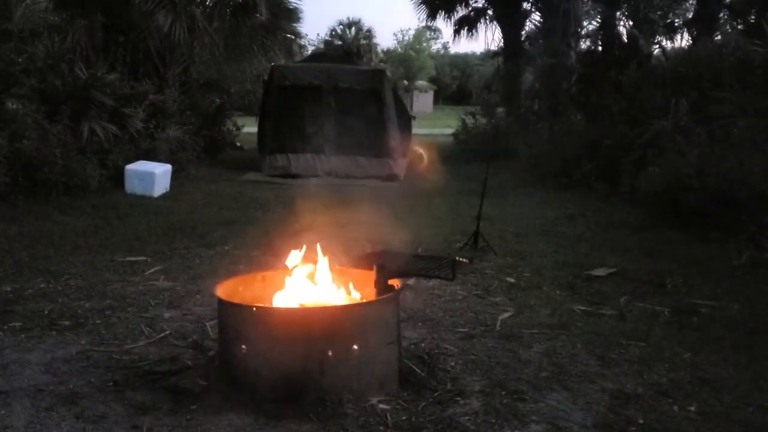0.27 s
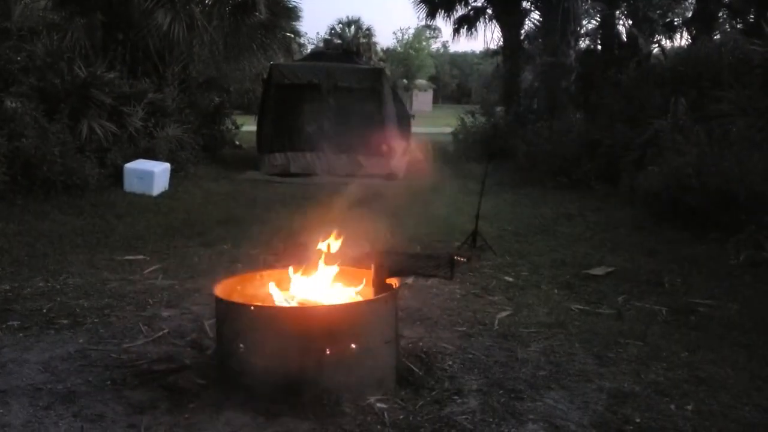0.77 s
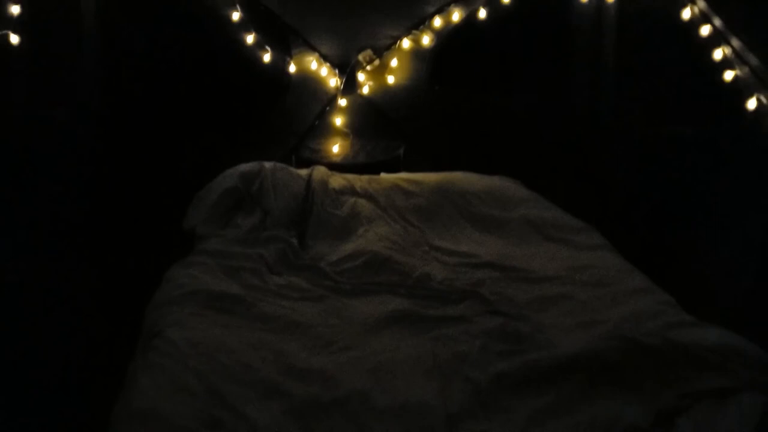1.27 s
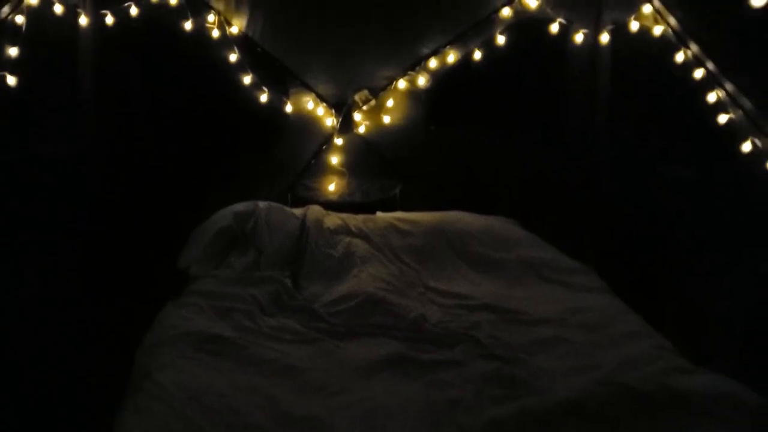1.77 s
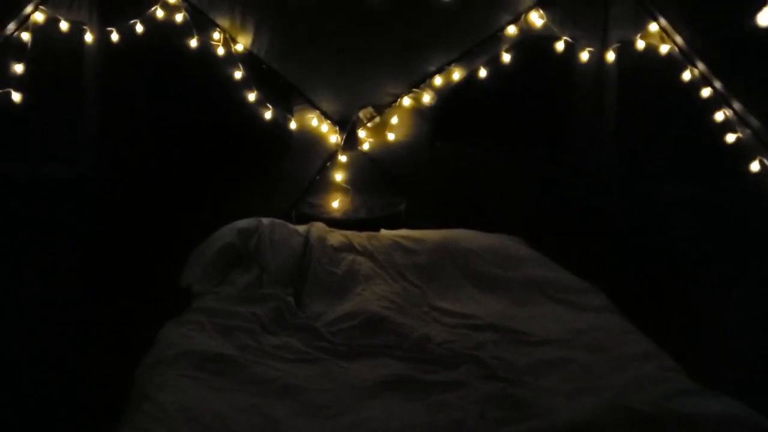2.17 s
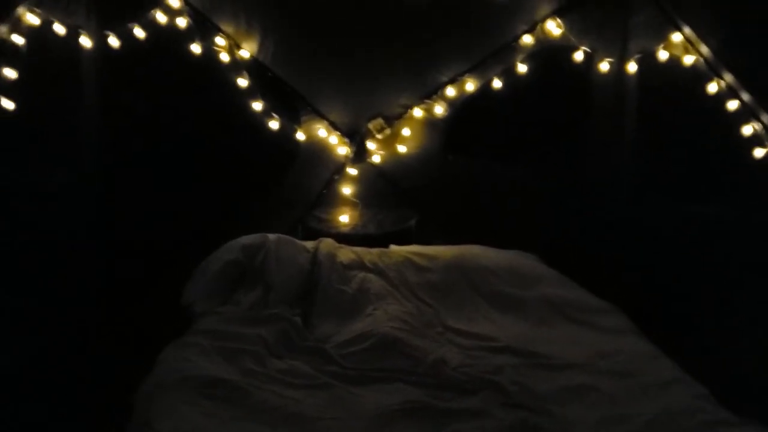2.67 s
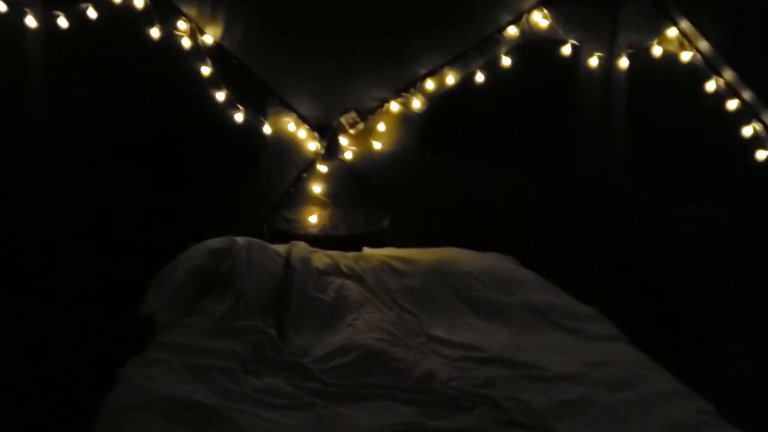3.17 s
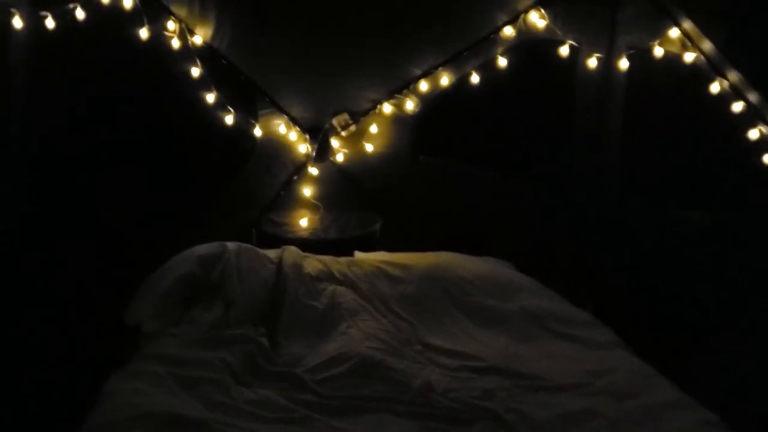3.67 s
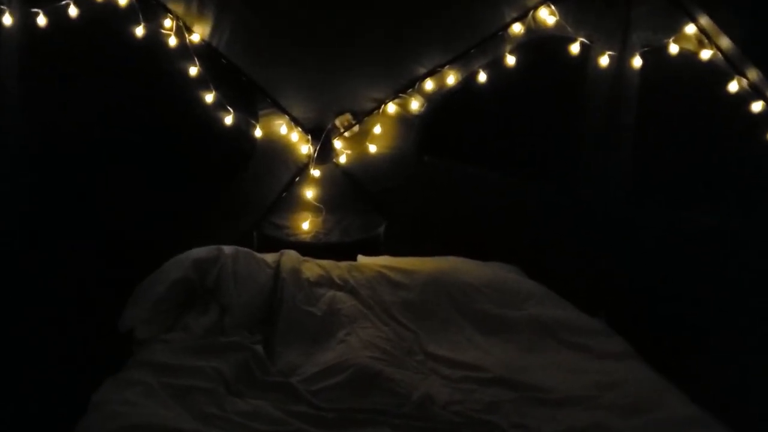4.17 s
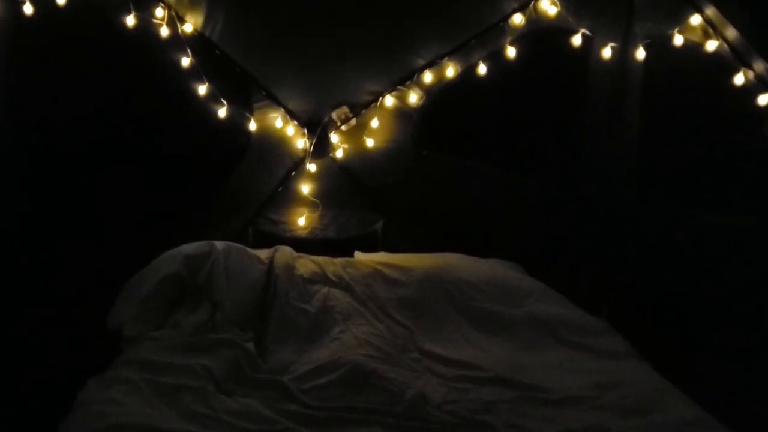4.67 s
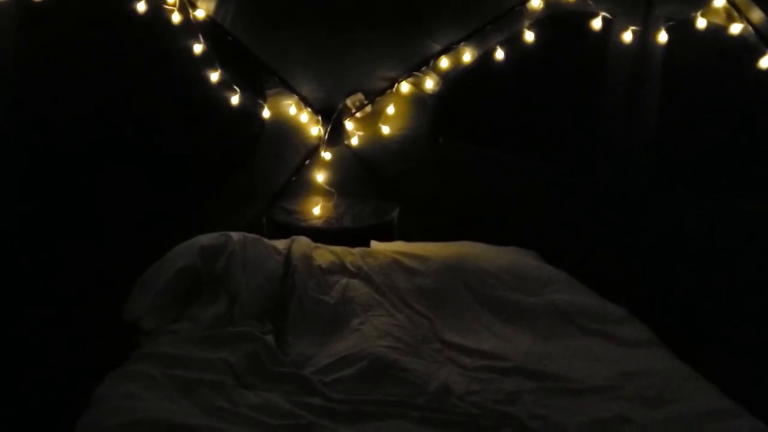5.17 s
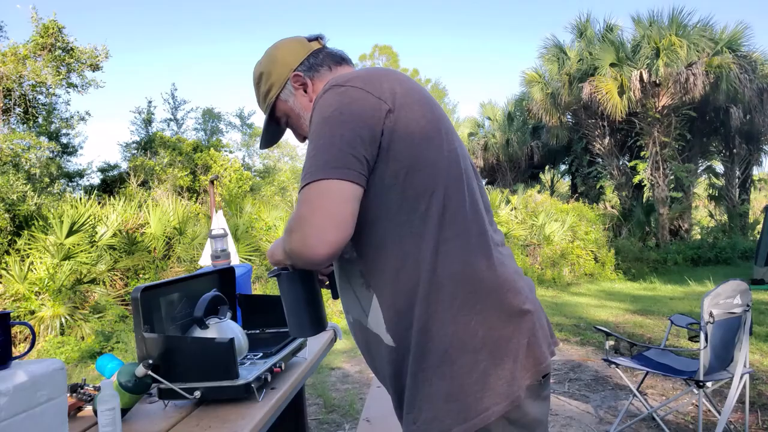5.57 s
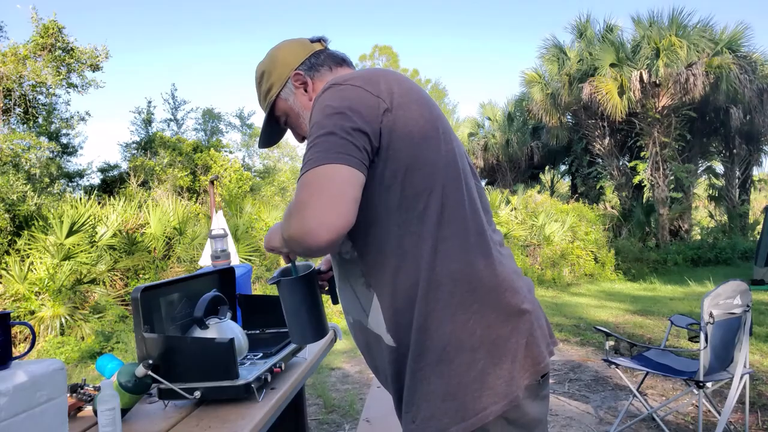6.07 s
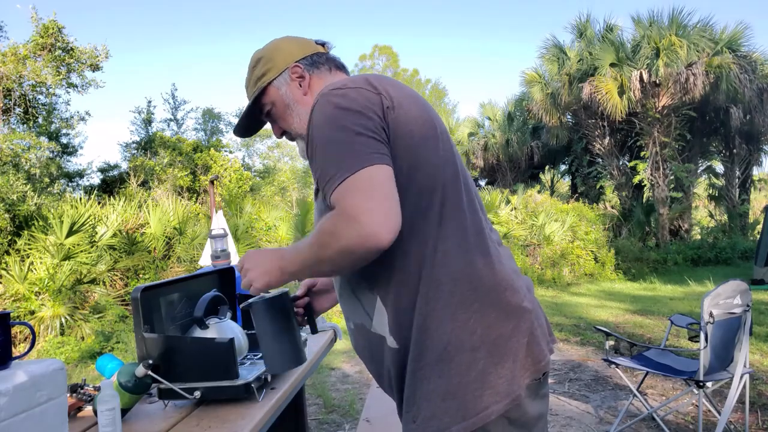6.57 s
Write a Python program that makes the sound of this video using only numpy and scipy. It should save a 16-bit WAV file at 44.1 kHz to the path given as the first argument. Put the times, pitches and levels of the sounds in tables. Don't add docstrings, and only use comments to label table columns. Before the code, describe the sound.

High crickets pulse over quiet night air, cut off by a dry plastic click; then in daylight a light metal tap and three ringing lid knocks.

```python
import sys
import numpy as np
from scipy import signal
from scipy.fft import rfft, irfft, next_fast_len
from scipy.io import wavfile
from scipy.ndimage import uniform_filter1d, map_coordinates

SR = 44100
rng = np.random.default_rng(int(sys.argv[2]) if len(sys.argv) > 2 else 0)


def transcribe(signal):
    frames = np.atleast_2d(signal).T
    limited = np.clip(frames, -1, 1)
    pcm = np.round(limited * 32767).astype(np.int16)
    wavfile.write(sys.argv[1], SR, pcm)


def rack_gain(trim_db):
    fader = np.asarray(trim_db, float)
    return 10 ** (fader / 20)


N = 300762
T = np.arange(N) / SR

# [fade-in start/s, full/s, fade-out start/s, gone/s]
PLACES = [
    (-.1, 0, .865, .895),
    (0.896, 0.923, 5.404, 5.413),
    (5.571, 5.595, 7, 7.1),
]

# [f/Hz, level per Hz/dB]
AIR_COLOUR = [
    [(13, -48), (22, -10.5), (81, 1), (180, -7), (389, -25.5), (1390, -34), (1730, -34), (3650, -35),
     (4550, -34.5), (5990, -18), (7270, -41.5), (7900, -52), (8580, -43.5), (12000, -37.5), (16200, -35)],
    [(13, -38), (22, -44), (55, 0), (85, 4.5), (173, -11.5), (384, -18.5), (764, -25.5), (1270, -36),
     (2420, -42), (4400, -31), (5720, -30.5), (9680, -120)],
    [(13, -50), (22, -25), (88, 1), (129, -11), (389, -20.5), (459, -16.5), (1050, -26.5), (1140, -19),
     (2200, -23.5), (2650, -23), (3300, -17.5), (3800, -23.5), (5300, -30), (5990, -31.5), (6690, -33.5),
     (7900, -44), (14900, -39.5), (16200, -22)],
]
AIR_DB = [-58.5, -59, -46.5]
# [f/Hz, likeness]
AIR_ALIKE = [
    [(60, 0.88), (240, 0.82), (950, 0.1), (3770, 0.042), (15000, 0.01)],
    [(60, 1), (240, 0.63), (950, 0.13), (3770, 0.033), (15000, 0.27)],
    [(60, 0.99), (240, 0.63), (950, 0.26), (3770, -0.45), (15000, 0.15)],
]
# [f/Hz, left minus right/dB]
AIR_LEAN = [
    [(60, -1.5), (180, -1.5), (550, -2.5), (1650, -5), (4970, 0.5), (15000, 8)],
    [(60, 19), (130, 34), (290, 7), (640, -1), (1410, 4.5), (3100, 3.5), (6820, -26), (15000, -2)],
    [(60, -1.5), (240, 0), (950, 0), (3770, 0.5), (15000, 8)],
]
# [t/s, level/dB]
ENGINE = [(0, -81), (.4, -91), (.85, -70), (.94, -62), (2.18, -73), (3.11, -72), (3.17, -88), (5.39, -69)]

# [f/Hz, level/dB, wing strokes per s]
HIGH_SINGERS = [(5630, -11, 60), (5720, -2, 57), (5800, -3, 50), (5880, 1, 63), (5945, 0, 55),
                (6050, -11, 66), (6160, -15, 59), (6260, -13, 52)]
# [f/Hz, level/dB, wing strokes per s]
LOW_SINGERS = [(5100, -3, 58), (5170, 0, 52), (5240, -2, 63), (5435, -1, 55)]
# [wing f/Hz, level/dB]
OVERTONE = [(5200, -24), (5740, -29), (5950, -39)]
# [t/s, left minus right/dB]
CHORUS_LEAN = [(0, 9), (.72, 0), (.88, -13.5), (2.82, -12.5), (3.97, -7.5), (5.39, -12)]
# [t/s, length/s, level/dB]
DUSK_HIGH = [
    (.14, 0.18, -61.5),
    (.66, 0.038, -61.5),
]
DUSK_LOW = [
    (.14, 0.15, -77),
    (.72, 0.19, -75),
]
NIGHT_HIGH = [(.92, 0.058, -47.5), (1.19, 0.18, -45), (1.59, 0.15, -46.5), (1.81, 0.12, -47),
              (2.03, 0.21, -48.5), (2.3, 0.16, -44.5), (2.53, 0.032, -47.5), (2.79, 0.11, -45),
              (3.0, 0.032, -53), (3.2, 0.21, -49), (3.56, 0.22, -53.5), (3.84, 0.041, -55.5),
              (4.18, 0.23, -53.5), (4.62, 0.15, -53.5), (4.84, 0.086, -61), (5.05, 0.18, -53.5)]
NIGHT_LOW = [(0.935, 0.077, -58), (1.167, 0.35, -59), (1.77, 0.17, -58), (2.125, 0.3, -57.5),
             (2.7, 0.33, -58), (3.22, 0.16, -61), (3.52, 0.25, -65), (4.07, 0.15, -60), (4.527, 0.2, -61),
             (5.07, 0.18, -56)]
PHRASE_RISE_S, PHRASE_FALL_S = 0.068, 0.12
DUSK_SHIFT, NIGHT_SHIFT = 1.01, 1.0

# [t/s, length/s, level/dB, climb/Hz]
DUSK_CALLS = [
    (.0648, 0.19, -62, 170),
    (.6928, .18, -60, 170),
]
# [t/s, length/s, level/dB, climb/Hz]
NIGHT_CALLS = [(.898, 0.14, -54.5, 9), (1.4767, 0.2, -56, 110), (2.1185, 0.18, -56, 110),
               (2.74, 0.18, -59.5, 129), (3.34, 0.19, -60.5, 157), (3.96, 0.2, -60, 154),
               (4.633, 0.086, -57.5, 177), (5.08, 0.2, -60, 125)]
# [t/s, length/s, level/dB, climb/Hz]
NEIGHBOUR_CALLS = [(.93, 0.12, -60, 116), (2.72, .08, -72, 61), (3.315, 0.027, -55.5, 59.3),
                   (3.78, 0.023, -72, 60.6), (4.51, 0.04, -75, 60), (4.61, 0.033, -63, 61),
                   (5.055, 0.098, -61, 91.3)]
# [t/s, second/dB, third/dB]
FACING = [
    (2.95, 0, -13),
    (3.3, -5, -1),
]
CALL_RISE_S, CALL_FALL_S, GLIDE_S = .065, .045, .042
OFF_PITCH_DB = .22
HALO_DB, HALO_S = -21.5, 0.18

# [t/s, level/dB]
THROBS = [(.085, -60), (0.167, -45.5), (.222, -45), (.28, -55), (.541, -62), (.583, -46), (.638, -50),
          (.699, -59), (.828, -59)]
THROB_S = 0.051
TRILL_DB, TRILL_LEAN_DB = -69.5, -5.5
PAUSE_S, PAUSE_LENGTH_S, PAUSE_DB = 2.276, 0.13, -23

# [t/s, level/dB]
RUB_EFFORT = [(.92, -90), (1.3, -79), (1.5, -85.5), (1.87, -74), (2.06, -71), (2.41, -77), (2.46, -69.5),
              (2.62, -71.5), (2.77, -65), (3.1, -71.5), (3.29, -65.5), (3.56, -74.5), (3.83, -69.5),
              (3.96, -76), (4.33, -66.5), (4.55, -80.5), (4.85, -65), (5.39, -72.5)]
# [t/s, level/dB]
SLIDE_SPEED = [(.92, -82), (1.2, -84), (1.35, -76), (1.6, -78.5), (1.9, -72), (2.1, -74), (2.55, -77),
               (2.85, -71), (3.1, -71.5), (3.4, -68.5), (3.6, -77.5), (3.85, -80), (4.05, -80),
               (4.3, -70.5), (4.5, -80), (4.75, -75), (4.95, -76.5), (5.39, -75)]
# [t/s, length/s, level/dB]
SWISHES = [
    (3.024, 0.0054, -60.5),
    (3.19, 0.053, -69),
    (3.268, 0.015, -58.5),
]
# [f/Hz, level per Hz/dB]
RUB_COLOUR = [(700, -19), (1300, -11), (2500, -5.5), (4000, -2.5), (6500, 2.5), (8000, -47)]
FIZZ_COLOUR = [(8200, -22), (9400, -11), (10300, -5.5), (11700, 0.5), (13300, -4), (14300, -5), (15300, -1),
               (16000, -4)]

# [t/s, f/Hz, level/dB]
NOTES = [(.955, 6350, -63), (.95, 5250, -53), (.98, 5350, -56), (1.08, 5680, -53.5), (1.21, 5170, -53),
         (1.279, 5900, -37.5), (1.595, 5900, -52), (2.075, 5950, -53), (2.8, 5420, -52), (2.85, 5970, -44),
         (2.898, 5680, -43), (2.95, 5160, -50), (3.02, 6160, -52), (3.08, 6250, -56), (3.165, 5780, -58),
         (3.33, 5400, -54), (3.399, 5880, -42.5), (3.919, 5800, -46), (3.98, 5870, -50), (4.11, 5460, -51),
         (4.23, 5920, -49), (4.35, 5980, -46.5), (4.47, 5470, -51), (4.5, 5800, -46), (4.6, 5640, -48),
         (4.69, 6170, -48), (4.7, 5420, -50), (4.74, 6230, -52), (4.87, 5400, -53), (5.049, 5990, -48),
         (5.171, 5950, -46), (5.241, 5670, -46)]
NOTE_S, NOTE_LEAN_DB = 0.031, -27
# [t/s, peak level/dB]
ENTRIES = [(1.5887, -38), (2.0678, -40), (2.815, -34.5), (3.159, -54), (3.301, -38.5), (3.907, -49),
           (4.567, -48), (4.6895, -42.5), (5.0427, -44)]
DYING_S = 0.34

# [t/s, peak level/dB]
FINGER_TICKS = [
    (5.0318, -57),
    (5.3513, -65),
]
# [t/s, peak level/dB, left minus right/dB]
BUTTON_TICKS = [
    (5.3995, -26, 3),
    (5.4037, -23, 3),
]

# [t/s, peak level/dB]
TAP = [
    (5.595, -26),
]
# [f/Hz, level/dB, time to fall 60 dB/s]
TAP_MODES = [(1383, -17, .4), (2007, -12, .1), (2438, -13, .15), (2768, 0, .48), (3242, -14, .2),
             (4217, -10, .2), (4270, -12, .2)]
# [t/s, level/dB, tilt per octave/dB, length/s]
SLEEVE = [
    (5.622, -47, 1.5, 0.029),
]
# [t/s, peak level/dB, rattle tilt per octave/dB, scrape/s, left minus right/dB]
KNOCKS = [
    (6.052, -11.5, 2, 0.0027, 4.5),
    (6.206, -11, 3.5, 0.043, 4),
    (6.371, -13, 2, 0.034, 4.5),
]
SETTLE_S = [0, 0, .013]
# [f/Hz, time to
# fall 60 dB/s, level at first knock/dB, at second/dB, at third/dB]
WALL = [(1195, 0.3, -33, -39, -41), (1382, 0.7, -34, -35, -33), (1432, 0.45, -34, -42, -27),
        (1867, 0.5, -26, -36, -26), (1877, 0.6, -31, -36, -30), (2400, 0.22, -31, -33, -27),
        (2439, 0.3, -37, -41, -35), (2627, 1.1, -20, -30, -21), (2762, 0.45, -40, -40, -39),
        (2836, 0.45, -35, -39, -38), (3021, 0.3, -33, -25, -38), (3120, 0.6, -48, -46, -39),
        (3255, 0.3, -29, -28, -23), (3563, 1.4, -44, -38, -35)]
STEEL_MODES = [(3147, 0.3, -39, -33, -37), (4087, 0.4, -46, -31, -38), (4138, 0.45, -36, -26, -34),
               (4198, 0.4, -34, -32, -30), (4214, 0.45, -33, -26, -30), (4270, 0.45, -35, -33, -36),
               (4600, 0.5, -38, -31, -39), (4652, 0.5, -34, -33, -45), (4880, 0.22, -41, -31, -40),
               (5200, 0.2, -37, -35, -46), (5408, 0.35, -38, -39, -37), (5580, 0.3, -44, -31, -43),
               (5853, 0.33, -29, -28, -38), (5953, 0.36, -42, -32, -40),
               (2660, .3, -44, -38, -43), (2740, .35, -41, -36, -39), (3088, .35, -44, -35, -43),
          (3860, .2, -41, -34, -36), (6087, .25, -34, -34, -36), (6189, .6, -45, -51, -37),
          (6233, .25, -36, -43, -30), (6282, .3, -49, -31, -41), (6542, .35, -38, -33, -44),
          (7858, .35, -48, -33, -44), (8331, .3, -49, -37, -57),
               (527, 0.15, -47.5, -70, -44.5), (752, 0.072, -35.5, -40, -35.5), (1093, 0.15, -40, -46, -40),
        (1840, 0.12, -28, -45, -50), (2034, 0.16, -22, -32, -31), (2078, 0.039, -12.5, -20, -13.5),
        (2710, 0.18, -46, -19, -33), (3257, 0.086, -11.5, -11.5, -13.5),
               (6940, 0.44, -52, -32.5, -38), (8600, 0.81, -51, -52, -47), (8800, 0.43, -48, -47, -56),
          (9400, 0.44, -52, -31, -54), (9700, 0.26, -31, -29, -30), (9830, .21, -54, -44, -36),
          (10100, 0.25, -42, -32, -28), (10680, 0.31, -42, -44, -43), (10700, 0.42, -52, -38, -48),
          (12460, .12, -48, -42, -39), (12800, .24, -58, -48, -52), (14480, .17, -56, -50, -50)]
# [f/Hz, level against the knock/dB, time to fall 60 dB/s]
LID = [(1399, -31, 3), (1384, -33, 3), (1870, -33, 3.2), (2630, -37, 5)]
SPLIT_HZ, SPLIT_DEPTH = 8.4, 0.12
# [f/Hz, level per Hz/dB]
RATTLE_COLOUR = [(400, -23.5), (750, -20.5), (1500, -8.5), (2500, 2.5), (4500, -1), (8000, -9),
                 (12000, -13.5), (16000, -19)]
# [f/Hz, time to fall 60 dB/s]
RATTLE_T60 = [(600, .08), (2000, .1), (5000, .13), (10000, .14), (16000, .13)]


def unit(x):
    return x / np.sqrt(np.mean(x ** 2) + 1e-20)


def even(x, size):
    power = np.abs(uniform_filter1d(x ** 2, size=size, axis=-1))
    return unit(x / np.sqrt(power + 1e-9))


def along(points, hz):
    f, v = np.transpose(points)
    return np.interp(np.log(hz + 1), np.log(f + 1), v)


def curves(rows):
    s, *cols = np.transpose(rows)
    return [np.interp(T, s, c) for c in cols]


def wobble(rate):
    return map_coordinates(rng.standard_normal(int(N * rate / SR) + 4), [T * rate])


def sides(lean_db):
    g = np.array([rack_gain(lean_db / 2), rack_gain(-lean_db / 2)])
    return 2 * g / np.sqrt(np.sum(g ** 2, axis=0))


def filtered(x, response):
    m = next_fast_len(x.shape[-1] + 8192)
    spectrum = rfft(x, m) * response(np.fft.rfftfreq(m, 1 / SR))
    return irfft(spectrum, m)[..., :x.shape[-1]]


def noise(spectrum, patchy_db):
    z = signal.stft(rng.standard_normal((2, N)), nperseg=512)[2]
    field = uniform_filter1d(rng.standard_normal(z.shape[1:]), size=6, axis=0)
    field = uniform_filter1d(field, size=12, axis=1)
    both = signal.istft(z * rack_gain(patchy_db * unit(field)), nperseg=512)[1][:, :N]
    closed = [(spectrum[0][0] * .8, -120), *spectrum, (spectrum[-1][0] * 1.1, -120)]
    return unit(filtered(both, lambda hz: rack_gain(along(closed, hz))))


def phrases(rows, rise, fall, bed_db=-120):
    power = rack_gain(2 * bed_db)
    for s, length, db in rows:
        shape = np.interp(T, [s - rise, s, s + length, s + length + fall], [0, 1, 1, 0]) ** 2
        power = power + (rack_gain(db) * shape) ** 2
    return np.sqrt(power)


def strokes(hz, rate, depth, fall, overtones_db=(), order=4, since=None):
    free = np.cumsum(rate * (1 + 0.0395 * wobble(8.9))) / SR + rng.random()
    beat = (free if since is None else rate * since) % 1
    phase = 2 * np.pi * np.cumsum(hz * (1 + fall * (.5 - beat))) / SR
    tone = np.sin(phase)
    for k, db in enumerate(overtones_db):
        tone = tone + rack_gain(db) * np.sin((k + 2) * phase)
    return unit(tone * (1 - np.clip(depth, 0, 1) * np.abs(np.cos(np.pi * beat)) ** order))


def foliage(x, wet_db, flutter_db):
    t = np.arange(SR // 5) / SR
    tails = rng.standard_normal((2, len(t))) * rack_gain(-60 * t / 0.28)
    wet = unit(signal.fftconvolve(x[None], tails, axes=1)[:, :N])
    flutter = rack_gain(flutter_db * np.array([wobble(22), wobble(25)]))
    return unit(flutter * (x * [[1], [-1]] + rack_gain(wet_db) * wet))


def air(place):
    def turn(hz):
        return np.arccos(np.clip(along(AIR_ALIKE[place], hz), -1, 1)) / 2

    def blend(hz):
        return np.array([np.cos(turn(hz)), np.sin(turn(hz))])

    a, b = filtered(noise(AIR_COLOUR[place], patchy_db=1.82), blend)
    both = filtered(np.array([a + b, a - b]), lambda hz: sides(along(AIR_LEAN[place], hz)))
    return rack_gain(AIR_DB[place]) * both / np.std(both.mean(axis=0))


def drone():
    hum = noise([(150, -32.0), (300, 2), (400, 6.5), (800, -13.5), (1300, -47.0)], patchy_db=5.5)
    return rack_gain(curves(ENGINE)[0] - 0.5) * hum


def choir(singers, shift, swell_db):
    crowd = 0
    for hz, db, rate in singers:
        pitch = hz * shift * (1 + .004 * wobble(9) + .006 * wobble(3))
        voice = strokes(pitch, rate, depth=.95, fall=.022, overtones_db=(along(OVERTONE, hz),))
        gain = rack_gain(db + swell_db * wobble(7.3) + 1.06 * wobble(20.99))
        crowd = crowd + gain * foliage(voice, wet_db=0.0, flutter_db=4.0)
    return even(crowd, size=5000)


def chorus(high_rows, low_rows, high_bed_db, low_bed_db, shift):
    blur = noise([(4500, -13.5), (5000, -4.5), (5500, 2.0), (5850, 6.0), (6300, -33), (6450, -28.0),
                  (6900, -17.0), (7500, -61)], patchy_db=-1.0)
    high = unit(choir(HIGH_SINGERS, shift, swell_db=2.5) + rack_gain(-7) * blur)
    low = choir(LOW_SINGERS, shift, swell_db=3.5)
    both = phrases(high_rows, PHRASE_RISE_S, PHRASE_FALL_S, high_bed_db) * high
    both = both + phrases(low_rows, PHRASE_RISE_S, PHRASE_FALL_S, low_bed_db) * low
    return both * sides(curves(CHORUS_LEAN)[0])


def solo(calls, top_hz, depth, wet_db, second_db, order, lean_db, rate=52.5, rise=CALL_RISE_S, fall=.011):
    s, length, db, climb_hz = np.transpose(calls)
    latest = np.maximum(np.searchsorted(s - rise, T) - 1, 0)
    since = T - s[latest] + rise
    hz = top_hz - climb_hz[latest] * np.exp(-np.abs(since) / GLIDE_S)
    wing = strokes(hz, rate, depth, fall, order=order, since=since)
    voice = even(foliage(wing, wet_db, flutter_db=2), size=2600)
    upper = 0
    for k, partial_db in enumerate(curves(FACING)):
        upper = upper + rack_gain(partial_db) * strokes((k + 2) * hz, rate, depth=1, fall=.008, order=2, since=since)
    overtones = rack_gain(second_db - OFF_PITCH_DB * (top_hz - hz) + 2.8 * wobble(40)) * upper
    call = phrases(zip(s, length, db), rise, CALL_FALL_S)
    halo = rack_gain(HALO_DB) * phrases(zip(s, length, db), rise, HALO_S)
    return (voice * (call + halo) + overtones * call) * sides(lean_db)[:, None]


def throbbing_singer():
    swell = 0
    for s, db in THROBS:
        width = np.where(T < s, 1.02 * THROB_S, 0.88 * THROB_S)
        swell = swell + rack_gain(db) * np.exp(-8 * ((T - s) / width) ** 2)
    tone = np.sin(2 * np.pi * 6160 * T + 0.9 * wobble(70))
    return swell * tone * rack_gain(2.5 * wobble(110) - 2.5) * sides(10)[:, None]


def trill():
    db = TRILL_DB + PAUSE_DB * np.exp(-((T - PAUSE_S) / PAUSE_LENGTH_S) ** 2)
    wing = strokes(7520 * (1 + .009 * wobble(6)), 51.5, depth=.95, fall=.02)
    near = foliage(wing, wet_db=0, flutter_db=3)
    far = noise([(6300, -51), (6700, -14.0), (7300, -1.5), (7800, -8.5), (8200, -25.0)], patchy_db=-1.0)
    return unit(near + rack_gain(-1) * far) * rack_gain(db) * sides(TRILL_LEAN_DB)[:, None]


def cloth():
    rub_db, = curves(RUB_EFFORT)
    fizz_gain = rack_gain(curves(SLIDE_SPEED)[0]) + phrases(SWISHES, rise=0.021, fall=0.04)
    grain = rack_gain(1.3 * wobble(60) + 0.58 * wobble(240))
    rub = rack_gain(rub_db + 3.5) * unit(grain * noise(RUB_COLOUR, patchy_db=-1.5))
    fizz = fizz_gain * unit(grain * noise(FIZZ_COLOUR, patchy_db=2.5))
    return rub * sides(-5.8)[:, None] + fizz * sides(-6)[:, None]


def notes():
    drift = 0.5 * wobble(55)
    total = 0
    for s, hz, db in NOTES:
        width = np.where(T < s, 0.97 * NOTE_S, NOTE_S)
        swell = rack_gain(db) * np.exp(-8 * ((T - s) / width) ** 2)
        total = total + swell * np.sin(2 * np.pi * hz * T + drift)
    flutter = rack_gain(4.3 * np.array([wobble(100), wobble(140)]))
    return total * flutter * [[1], [-1]] * sides(NOTE_LEAN_DB)[:, None]


def entries():
    shape = 0
    for s, db in ENTRIES:
        attack = np.clip((T - s) / .0015, 0, 1) ** 2
        shape = shape + rack_gain(db - 9 - 20 * (T - s) / DYING_S) * attack
    starts = np.array(ENTRIES)[:, 0]
    since = T - starts[np.maximum(np.searchsorted(starts, T) - 1, 0)] + .006
    wing = strokes(5900 * (1 + .008 * wobble(6)), 60, depth=.6, fall=.03, since=since)
    return foliage(wing, wet_db=-12, flutter_db=1) * shape * sides(-14.0)[:, None]


def button():
    out, t = np.zeros((2, N)), np.arange(90) / SR
    for s, db, lean_db in BUTTON_TICKS + [(s, db, 0) for s, db in FINGER_TICKS]:
        tick = rng.standard_normal((2, len(t))) * rack_gain(-60 * t / 0.0033)
        out[:, round(s * SR):][:, :len(t)] += rack_gain(db) * tick * sides(lean_db)[:, None]
    plastic = [(1000, -25), (5000, -31.0), (6500, 6.0), (16000, 0.5)]
    return filtered(out, lambda hz: rack_gain(along(plastic, hz)))


def ring(modes, t, stop, damping_db):
    hz, db, t60 = np.transpose(modes)[:, :, None]
    touch_db = damping_db * (hz / 2600) ** 2 * np.maximum(t - stop, 0)
    size = rack_gain(db - 60 * t / t60 - np.minimum(touch_db, damping_db / 20))
    split_hz = SPLIT_HZ * (0.48 + rng.random(hz.shape))
    twin = np.cos(2 * np.pi * (split_hz * t + rng.random(hz.shape)))
    size = size * (1 + SPLIT_DEPTH * twin)
    start = 2 * np.pi * rng.random(hz.shape)
    lead = np.minimum(1.9 * (hz / 2600) ** 2, 2.05)
    lead = lead + rng.normal(0, 1, hz.shape) * np.clip(hz / 5000 - .5, 0, 1)
    uneven_db = rng.normal(0, 1, hz.shape) * np.minimum(hz / 3000, 3)
    ears = []
    for gain, shift in zip(sides(uneven_db) / np.sqrt(2), (lead, 0)):
        ears.append(gain * size * np.sin(2 * np.pi * hz * t + start + shift))
    return np.sum(ears, axis=1) * (1 - np.exp(-t / 0.001))


def rattle(t, tilt_db, scrape):
    hz, s, z = signal.stft(rng.standard_normal((2, len(t))), SR, nperseg=128)
    decay_db = -60 * np.maximum(s - scrape, 0) / along(RATTLE_T60, hz)[:, None]
    colour_db = along(RATTLE_COLOUR, hz) + tilt_db * np.log2(hz / 3000 + 0.043)
    burst = signal.istft(z * rack_gain(decay_db + colour_db[:, None]), SR, nperseg=128)[1][:, :len(t)]
    return burst / np.std(burst[:, :800]) * (1 - np.exp(-t / 0.00029))


def pot():
    out, t = np.zeros((2, N + SR)), np.arange(SR // 2) / SR

    def place(s, sound):
        out[:, round(s * SR):][:, :len(t)] += sound

    for s, db in TAP:
        place(s, rack_gain(db - 8.5) * ring(TAP_MODES, t, 0, 0) + rack_gain(db - 11.5) * rattle(t, -6.0, 0.013))
    for s, db, tilt_db, length in SLEEVE:
        place(s, rack_gain(db) * rattle(t, tilt_db, length) * np.clip(t / 0.0058, 0, 1))
    crowd_hz = rng.uniform(1900, 15800, size=110)
    crowd_t60 = .21 * np.minimum(6500 / crowd_hz, 1) ** .7 * rack_gain(rng.uniform(-3, 4.5, size=110))
    # (s, dB per s)
    touches = [(row[0], 5000) for row in KNOCKS[1:]] + [(6.665, 200)]
    for k, (s, db, tilt_db, scrape, lean_db) in enumerate(KNOCKS):
        stop, damping_db = touches[k][0] - s, touches[k][1]
        scatter_db = rng.uniform(-13, 4, size=110)
        crowd_db = db - 22.0 + along(RATTLE_COLOUR, crowd_hz) + scatter_db
        crowd_db = crowd_db + 2.56 * tilt_db * np.log2(crowd_hz / 3000)
        modes = [(m[0], m[2 + k] - .5, m[1]) for m in STEEL_MODES]
        modes += list(zip(crowd_hz, crowd_db, crowd_t60))
        modes += [(hz, db + under_db - .5, t60) for hz, under_db, t60 in LID]
        wall = [(m[0], m[2 + k] - 1.2, m[1]) for m in WALL]
        steel = ring(modes, t, stop, damping_db)
        steel = steel + ring(wall, np.maximum(t - SETTLE_S[k], 0), stop - SETTLE_S[k], damping_db)
        knock = steel + rack_gain(db - 13.5) * rattle(t, tilt_db, scrape)
        place(s, knock * sides(lean_db)[:, None] / np.sqrt(2))
    return out[:, :N]


def scene():
    dusk = air(0) + throbbing_singer()
    dusk += chorus(DUSK_HIGH, DUSK_LOW, high_bed_db=-67.5, low_bed_db=-93, shift=DUSK_SHIFT)
    dusk += solo(DUSK_CALLS, top_hz=4975, depth=1, wet_db=-19, second_db=-33, order=1.2, lean_db=-14,
                 rate=55, rise=.03, fall=.018)
    night = air(1) + trill() + cloth() + notes() + entries() + button()
    night += chorus(NIGHT_HIGH, NIGHT_LOW, high_bed_db=-54.0, low_bed_db=-80, shift=NIGHT_SHIFT)
    night += solo(NIGHT_CALLS, top_hz=4825, depth=.5, wet_db=11, second_db=-20, order=3, lean_db=-12)
    night += solo(NEIGHBOUR_CALLS, top_hz=4705, depth=.7, wet_db=3, second_db=-40, order=4, lean_db=-10)
    day = air(2) + pot()
    fades = [np.interp(T, place, [0, 1, 1, 0]) ** 2 for place in PLACES]
    return fades[0] * dusk + fades[1] * night + fades[2] * day + (fades[0] + fades[1]) * drone()


def roll_off(x):
    return signal.sosfilt(signal.butter(12, 17000, fs=SR, output="sos"), x)


def record(dry):
    band_limit = [(15600, 0.0), (16000, -7.0), (16600, -37.0), (17000, -88.0)]
    mix = filtered(dry, lambda hz: rack_gain(along(band_limit, hz)))
    return roll_off(mix)


dry = scene()
out = record(dry)
transcribe(out)
```